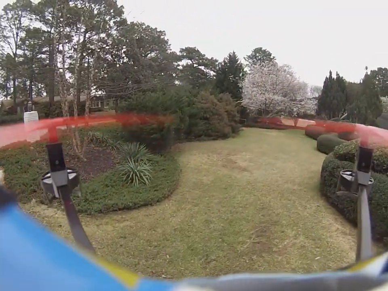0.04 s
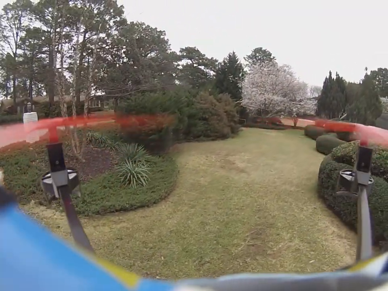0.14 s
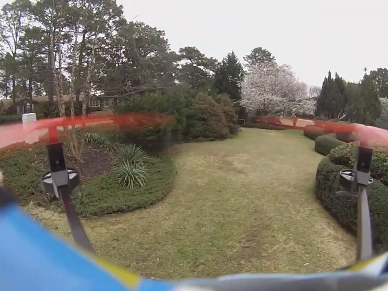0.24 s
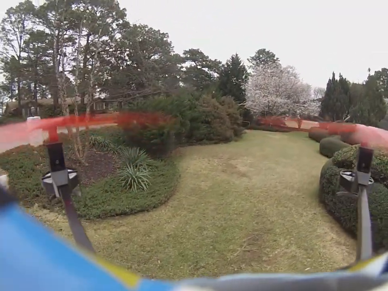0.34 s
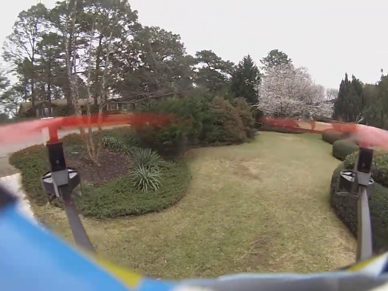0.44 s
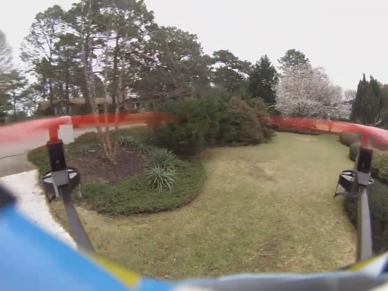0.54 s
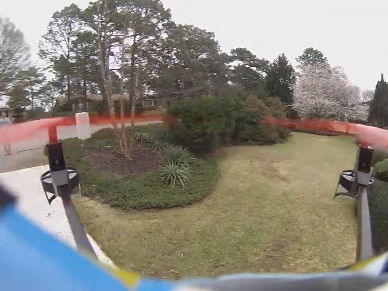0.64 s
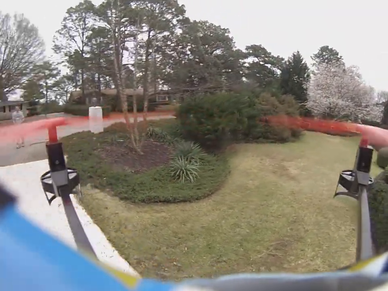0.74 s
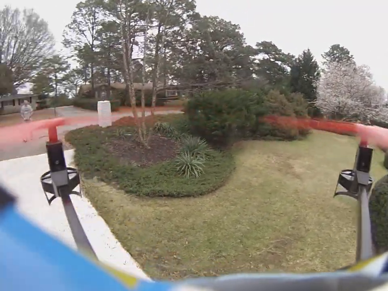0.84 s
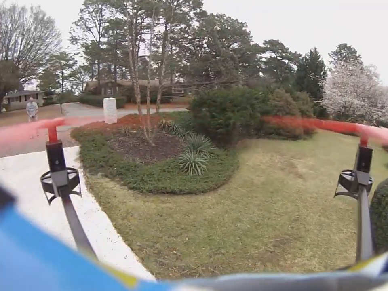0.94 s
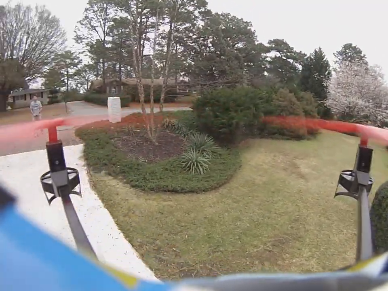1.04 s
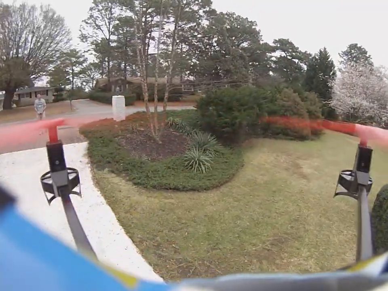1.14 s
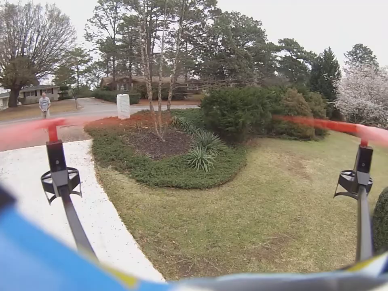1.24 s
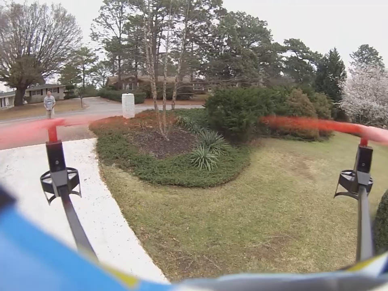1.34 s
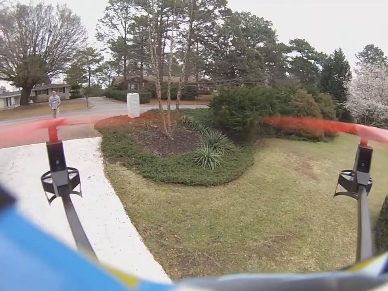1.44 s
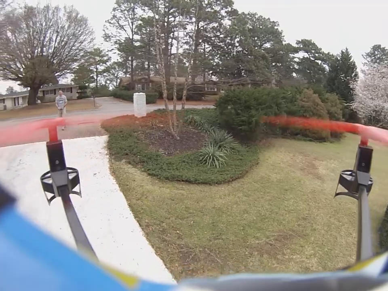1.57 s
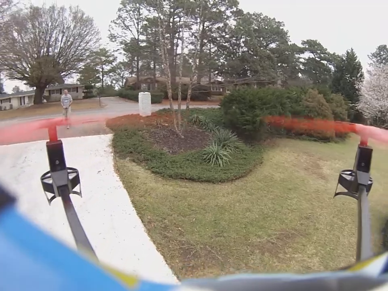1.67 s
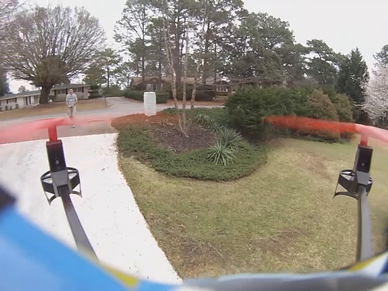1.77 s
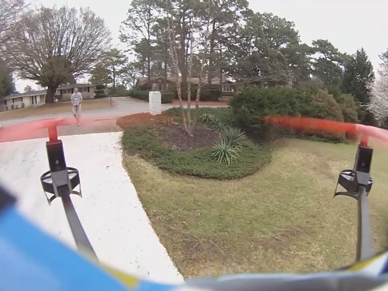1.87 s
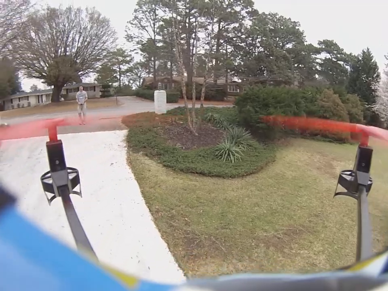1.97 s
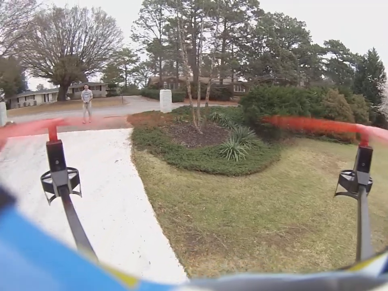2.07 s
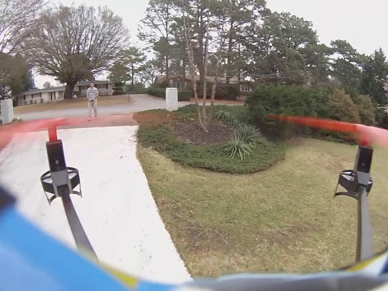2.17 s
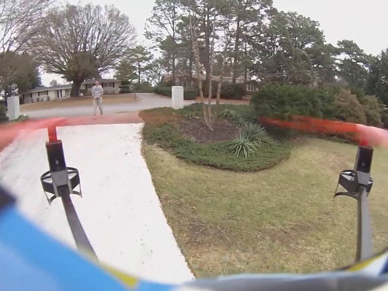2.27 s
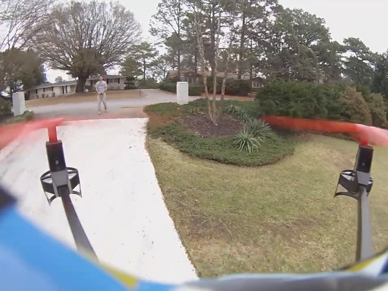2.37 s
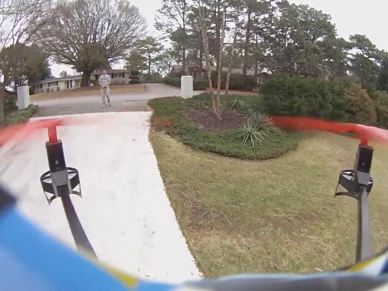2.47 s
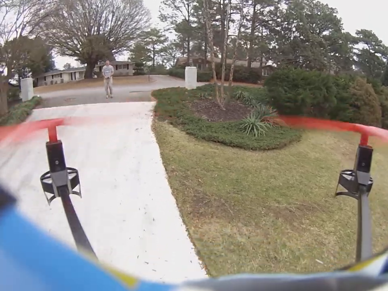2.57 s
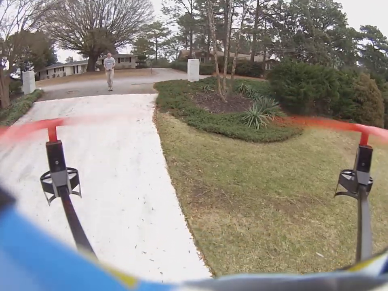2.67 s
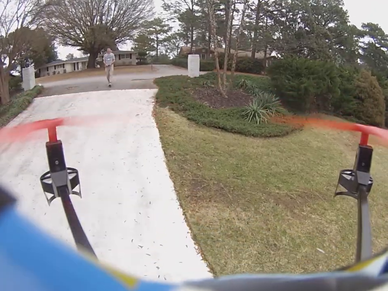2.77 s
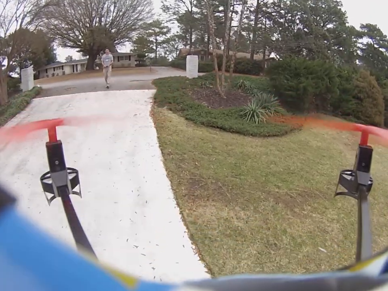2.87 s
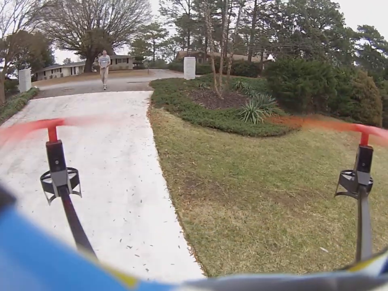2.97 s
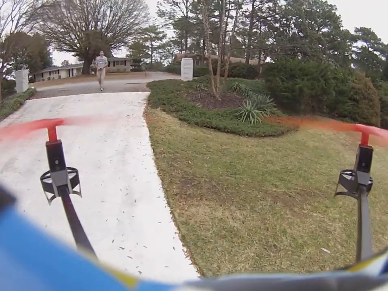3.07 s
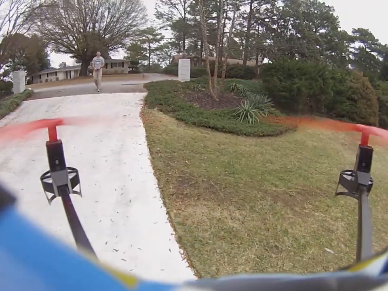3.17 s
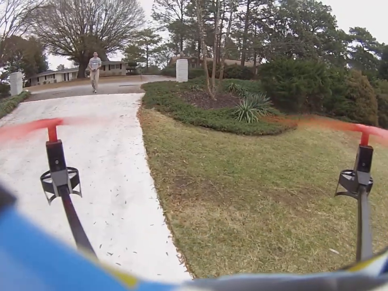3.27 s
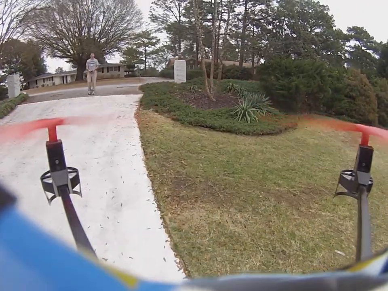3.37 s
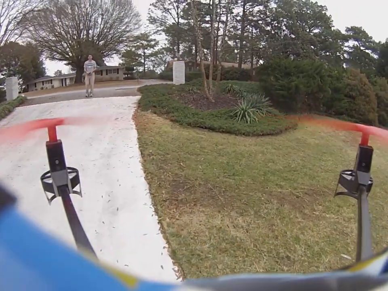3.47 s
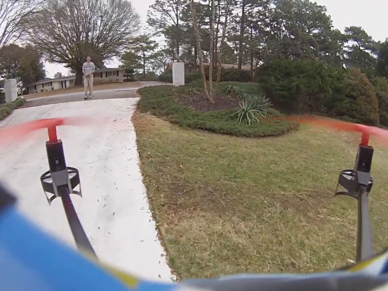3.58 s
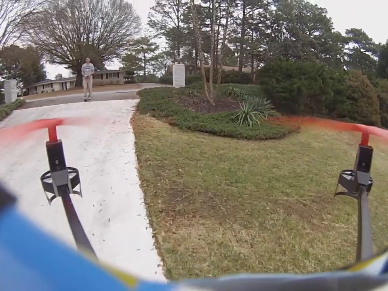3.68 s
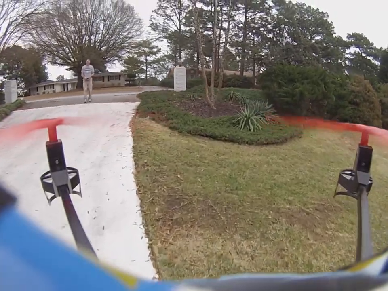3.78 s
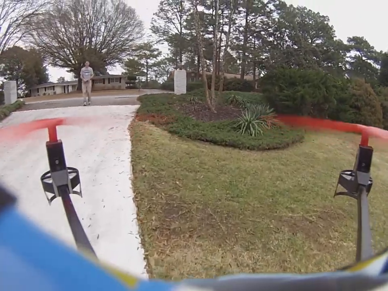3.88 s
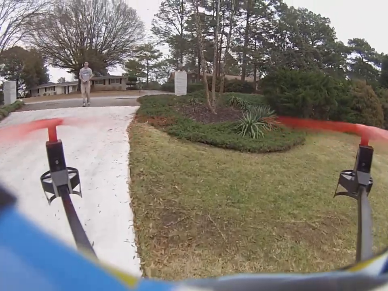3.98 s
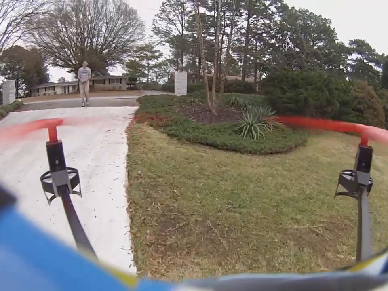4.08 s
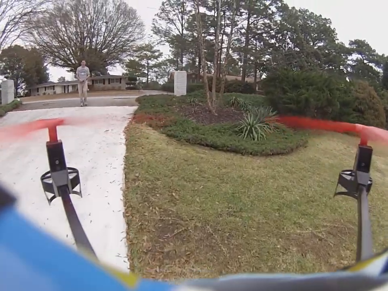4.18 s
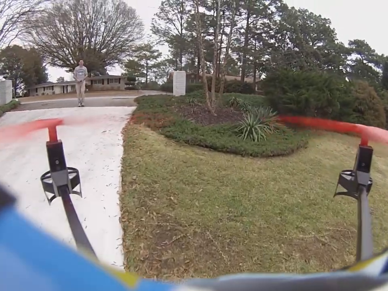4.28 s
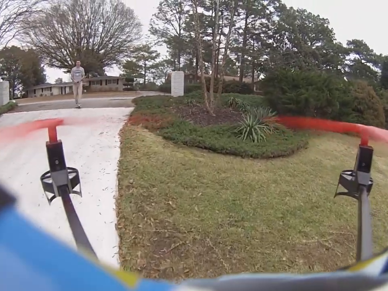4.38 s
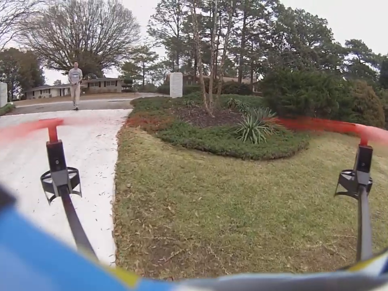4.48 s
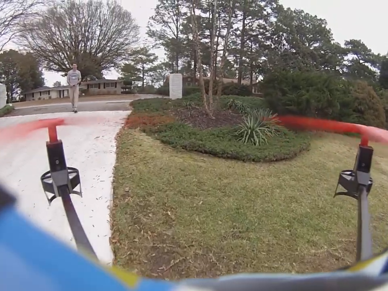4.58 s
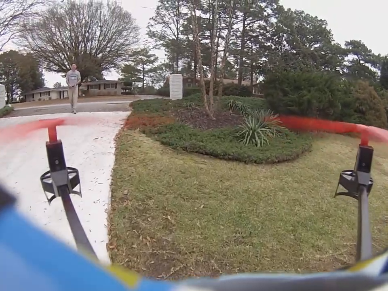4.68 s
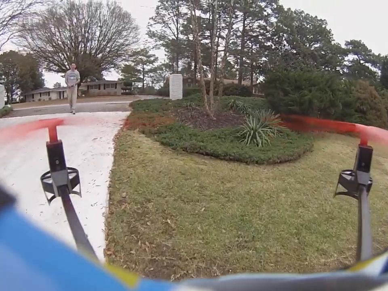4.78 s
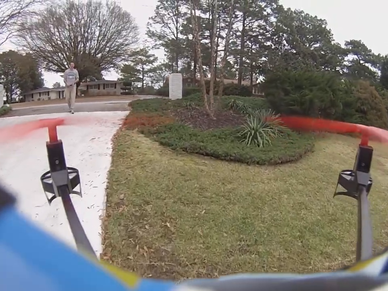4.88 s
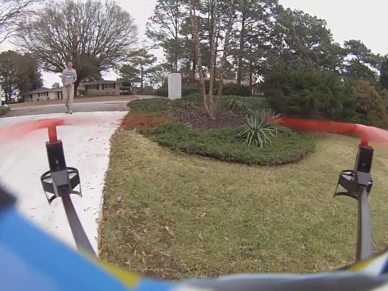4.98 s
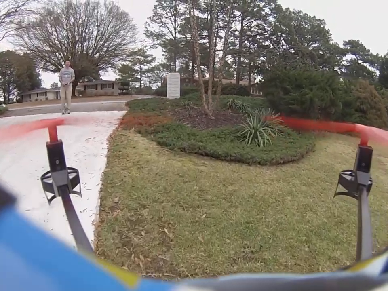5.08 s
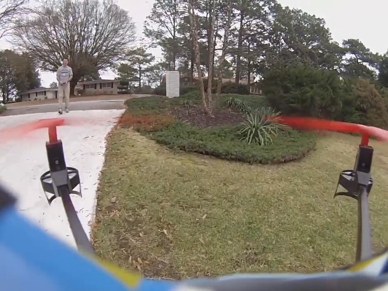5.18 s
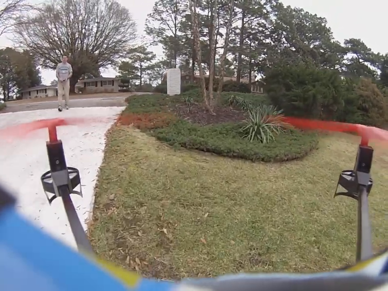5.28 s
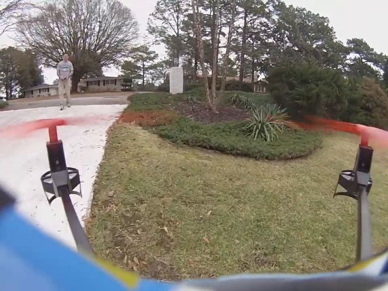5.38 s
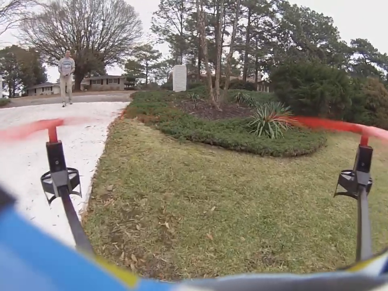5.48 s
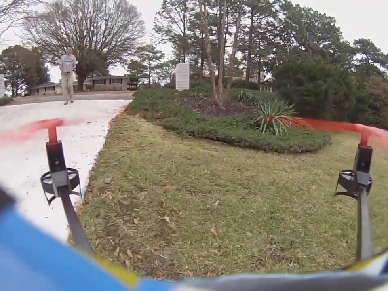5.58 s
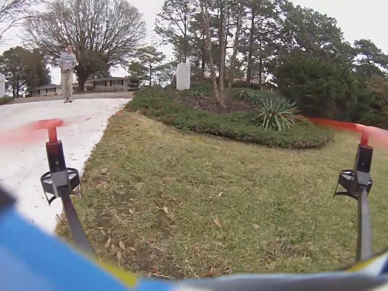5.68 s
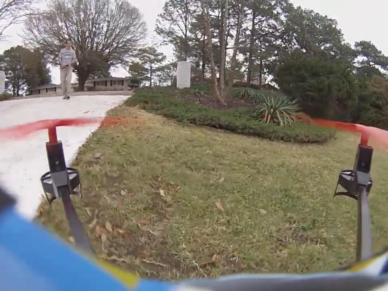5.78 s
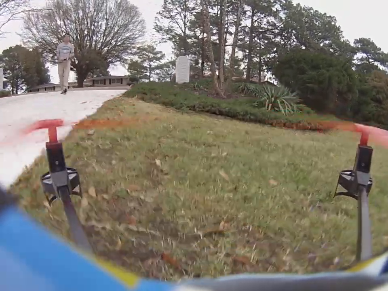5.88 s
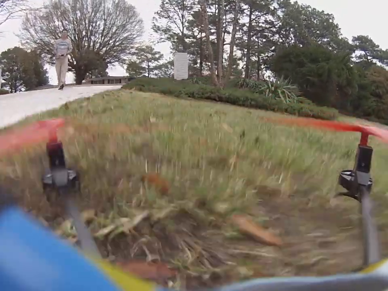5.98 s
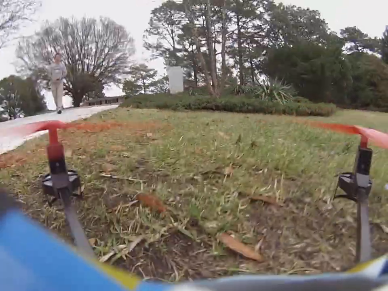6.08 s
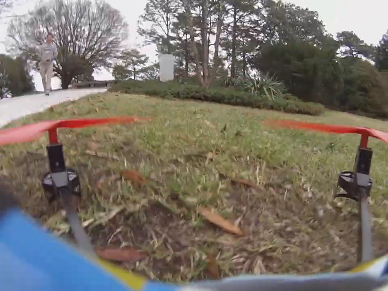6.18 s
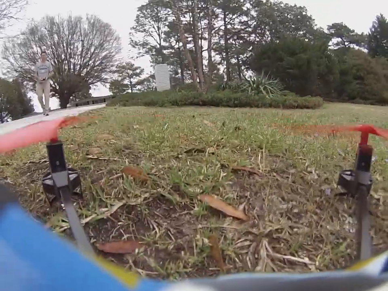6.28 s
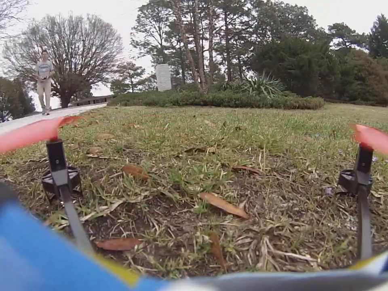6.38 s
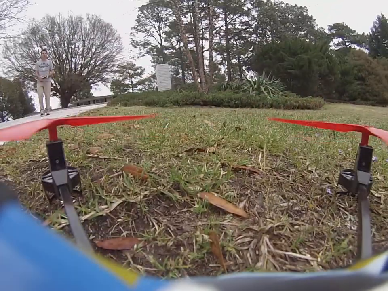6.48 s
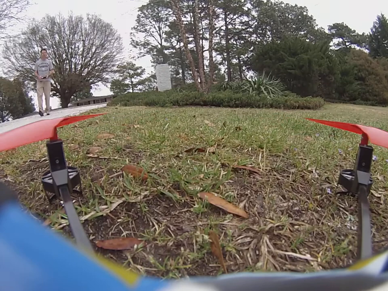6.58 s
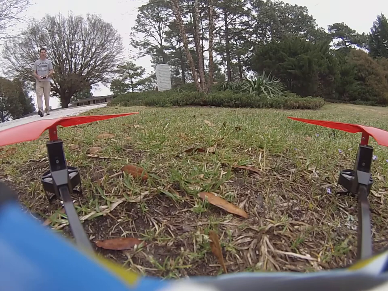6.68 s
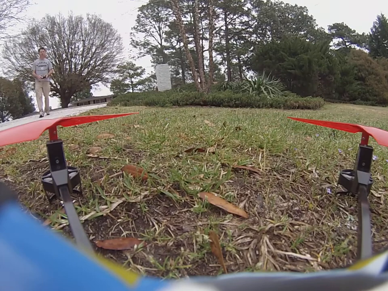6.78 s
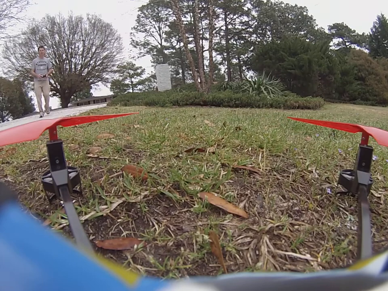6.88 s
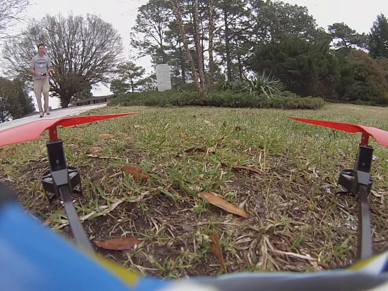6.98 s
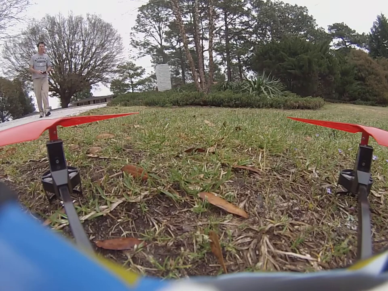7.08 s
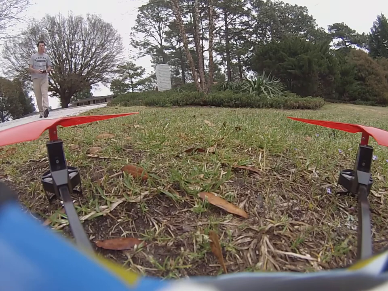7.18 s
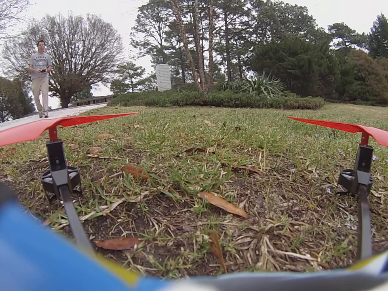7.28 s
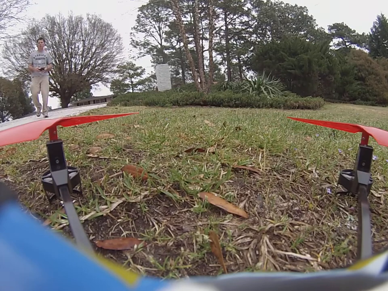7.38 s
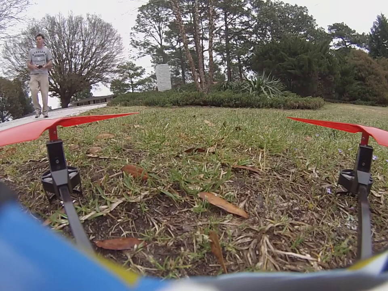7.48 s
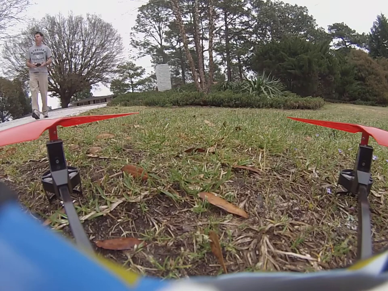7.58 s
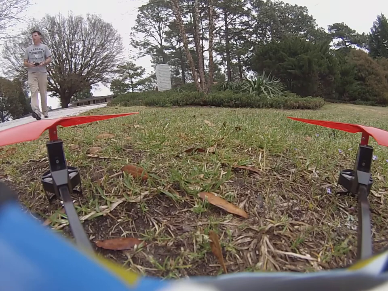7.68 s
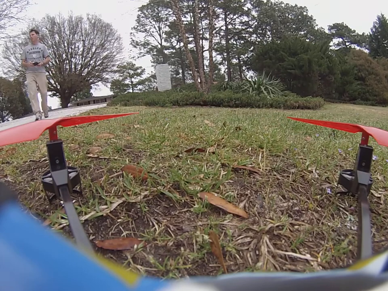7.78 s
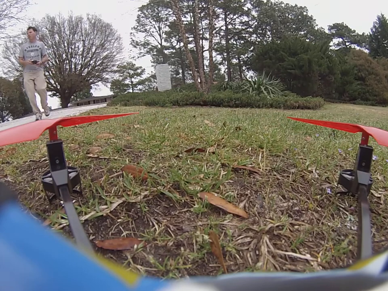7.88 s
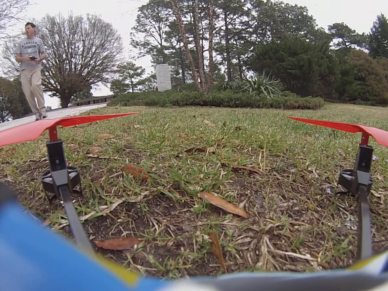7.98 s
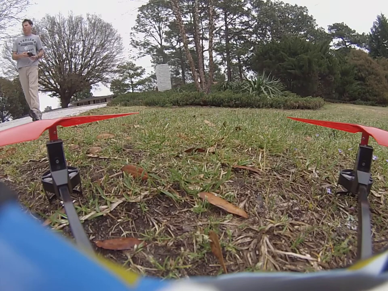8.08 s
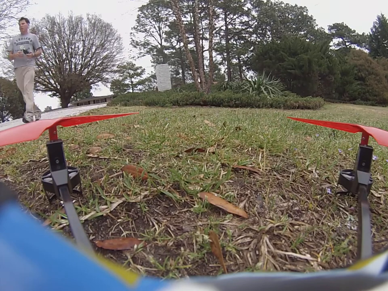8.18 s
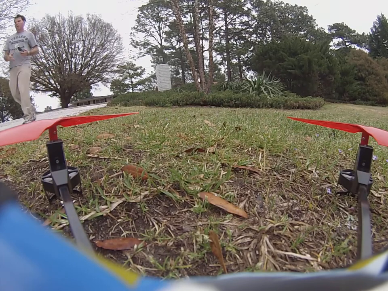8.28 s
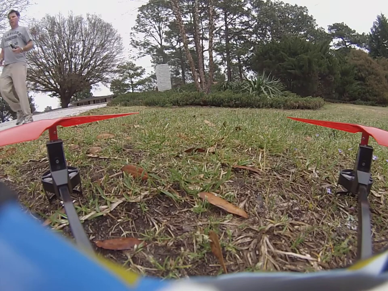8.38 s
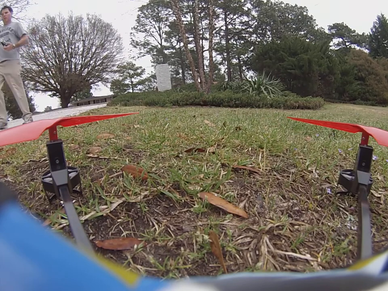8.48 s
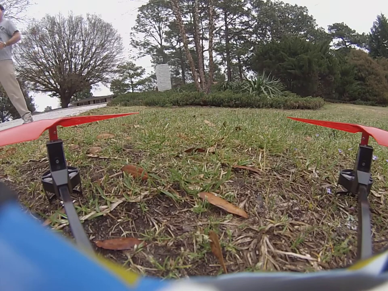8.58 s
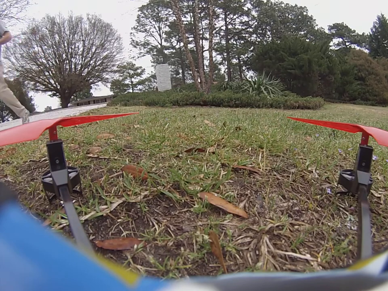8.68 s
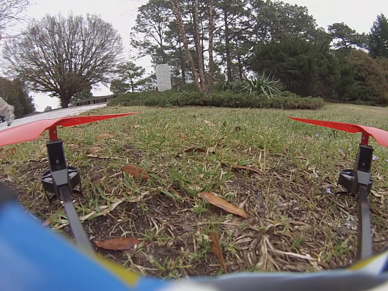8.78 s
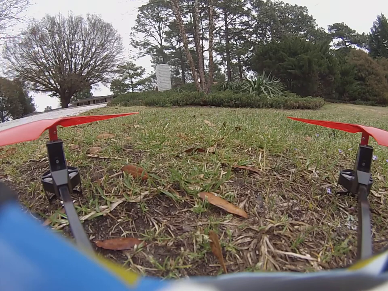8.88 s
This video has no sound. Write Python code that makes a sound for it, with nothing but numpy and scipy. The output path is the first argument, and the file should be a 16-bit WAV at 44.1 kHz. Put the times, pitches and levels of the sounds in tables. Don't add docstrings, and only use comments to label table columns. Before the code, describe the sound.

The microphone rides on a toy-like quadcopter outdoors: a loud, close, buzzing whine of several motors, drifting in pitch, with blade hiss and wind-like rumble. The pitch sags just before touchdown, sharp knocks and a small bounce follow, and power goes off abruptly. Loose gears chatter, slow and tick to rest. The remaining yard is hushed, with far traffic, soft buzzy bird trills, thin whistles and dry little ticks.

```python
import sys
import numpy as np
from scipy import signal
from scipy.fft import rfft, irfft, next_fast_len
from scipy.io import wavfile
from scipy.ndimage import uniform_filter1d

SR = 44100
rng = np.random.default_rng(int(sys.argv[2]) if len(sys.argv) > 2 else 0)


def materialize(psi):
    bounded = np.clip(np.atleast_2d(psi).T, -1, 1)
    quanta = np.round(bounded * 32767).astype(np.int16)
    wavfile.write(sys.argv[1], SR, quanta)


def elevation(decibels):
    levels = np.asarray(decibels, float)
    return 10 ** (levels / 20)


N = 394165
T = np.arange(N) / SR
GEAR = 120 / 11
CUT_S = 6.073


def columns(table):
    s, *cols = np.transpose(table)
    return [np.interp(T, s, c) for c in cols]


def ramp(start_s, db_per_s):
    return db_per_s * np.maximum(T - start_s, 0)


def unit(x):
    return x / np.sqrt(np.mean(x ** 2))


def colour(x, spectrum):
    hz, db = np.transpose(spectrum)
    size = next_fast_len(N)
    bins = np.arange(size // 2 + 1) * SR / size + 1
    gain = elevation(np.interp(np.log(bins), np.log(hz), db))
    return irfft(rfft(x, size) * gain, size)[:N]


def band(x, lo_hz, hi_hz):
    sos = signal.butter(2, [lo_hz, min(hi_hz, .45 * SR)], "band", fs=SR, output="sos")
    return signal.sosfilt(sos, x)


def walk(rate):
    k = int(SR / rate)
    held = np.repeat(rng.standard_normal(N // k + 1), k)
    return unit(uniform_filter1d(uniform_filter1d(held, k), k)[:N])


def partials(angle, orders, flicker_db):
    out = 0
    for k, db in orders:
        level = np.sqrt(2) * elevation(db + flicker_db * walk(25))
        out = out + level * np.sin(2 * np.pi * (k * angle + rng.random()))
    return out


# [f/Hz, level/dB per Hz]
YARD_TONE = [(12, -28), (20, -1), (49, 2.5), (153, 1), (254, -10.5), (456, -15), (510, -14), (554, -16),
             (1250, -23), (8090, -39), (13400, -48), (14500, -44.5), (15800, -71)]
YARD_LEVEL_DB = -48.5


def yard():
    air = unit(colour(rng.standard_normal(N), YARD_TONE))
    bass = band(air, 15, 250)
    swell = elevation(1.2 * walk(6.7))
    return elevation(YARD_LEVEL_DB) * (air + (swell - 1) * bass)


# [t/s, length/s, start f/Hz, end f/Hz, level/dB]
BUZZY_CALLS = [
    (6.84, 0.19, 6240, 8020, -59),
    (7.065, .19, 5650, 7750, -60),
    (7.29, 0.084, 5500, 6300, -57),
]
# [t/s, length/s, start f/Hz, end f/Hz, level/dB]
WHISTLED_CALLS = [
    (7.035, .02, 4250, 4200, -71),
    (7.145, .02, 4165, 4280, -76),
    (7.53, .03, 2650, 2770, -68),
    (7.59, .03, 2400, 2560, -68),
    (7.72, .2, 2350, 1840, -68),
    (8.35, 0.036, 2720, 2840, -64),
    (8.41, .04, 2150, 2480, -63),
    (8.53, .14, 2300, 2000, -63),
]
SAG = 1.3


def birds():
    out = np.zeros(N)
    uneven = 1 + .33 * walk(180)
    kinds = ((BUZZY_CALLS, 260, 1.6, .9, .3), (WHISTLED_CALLS, 30, .1, .45, .7))
    for calls, trill_hz, swing, rise, fade in kinds:
        for s, length, start_hz, end_hz, db in calls:
            t = T[:int(length * SR)]
            at = slice(int(s * SR), int(s * SR) + len(t))
            bend = SAG if end_hz < start_hz else rise
            hz = start_hz + (end_hz - start_hz) * (t / length) ** bend
            glide = np.cumsum(hz) * 2 * np.pi / SR
            trill = np.cumsum(trill_hz * uneven[at]) * 2 * np.pi / SR
            depth = swing * np.clip(t / 0.069, 0, 1)
            shape = np.sin(np.pi * t / length) ** fade
            out[at] += shape * elevation(db) * np.sqrt(2) * np.sin(glide + depth * np.sin(trill))
    echoes = ((.023, -15), (.061, -17), (.11, -19))  # (s, dB)
    return out + sum(elevation(db) * np.roll(out, int(s * SR)) for s, db in echoes)


def hits(rows, ring_s, rise_s, crack_s, grit, thud_hz):
    out, t = np.zeros(N), T[:2048]
    bright = unit(band(rng.standard_normal(N), 3800, 9500))
    rough = unit(band(rng.standard_normal(N), 500, 2100))
    for s, db, hz, crack_db, thud_db in rows:
        at = slice(int(s * SR), int(s * SR) + 2048)
        ring = np.sin(2 * np.pi * hz * t) + grit * rough[at]
        ring = ring * np.exp(-t / ring_s) * (1 - np.exp(-t / rise_s))
        crack = bright[at] * np.exp(-t / crack_s)
        thud = -np.sin(2 * np.pi * thud_hz * t) * np.exp(-t * thud_hz / 0.76)
        out[at] += elevation(db) * ring + elevation(crack_db) * crack + elevation(thud_db) * thud
    return out


# [t/s, peak level/dB, f/Hz, thud level/dB]
TICKS_IN_GRASS = [(7.226, -47, 654, -53.5), (7.292, -38, 645, -50), (7.383, -40, 1470, -52.5),
                  (7.747, -37.5, 458, -33), (8.199, -38, 440, -50), (8.259, -39, 650, -54),
                  (8.318, -34, 513, -54), (8.665, -32, 405, -48), (8.673, -46, 401, -35),
                  (8.686, -27.5, 694, -46), (8.696, -36, 910, -47), (8.723, -35.5, 1570, -39),
                  (8.751, -38, 448, -52)]


def grass_ticks():
    rows = [(s, db, hz, -90, thud_db) for s, db, hz, thud_db in TICKS_IN_GRASS]
    return hits(rows, ring_s=0.0016, rise_s=0.00028, crack_s=.001, grit=0.31, thud_hz=220)


# [t/s, peak level/dB, thud level/dB, crack level/dB]
FRAME_KNOCKS = [(6.043, -2, -15, -23.5), (6.05, -15.5, -4, -14.5), (6.063, -1, -14, -18.5),
                (6.064, -6.5, -6.5, -20.5), (6.066, -19.5, -17.5, -2.5), (6.071, -16.5, -23.5, -22.5),
                (6.119, -17, -22, -20), (6.255, -8, -16, -11), (6.283, -21.5, -16.5, -27),
                (6.296, 1, -23.5, -6.5), (6.305, -0.5, -12.5, -28.5), (6.468, -7.5, -32, -8.5)]


def landing_knocks():
    rows = [(s, db, 1100, crack_db, thud_db) for s, db, thud_db, crack_db in FRAME_KNOCKS]
    return hits(rows, ring_s=0.0011, rise_s=0.0006, crack_s=0.00089, grit=1.0, thud_hz=111)


# [t/s, peak level/dB, f/Hz, crack level/dB]
LAST_TEETH = [(6.655, -13.5, 1090, -25.5), (6.718, -17.5, 1440, -34.5), (6.745, -17, 1110, -48),
              (6.771, -18, 1150, -45), (6.82, -20, 1340, -49), (6.846, -21.5, 1440, -46),
              (6.884, -23, 1260, -39), (6.908, -24.5, 1420, -42.5), (6.934, -25, 1250, -63),
              (6.946, -41, 1070, -52), (6.972, -29, 2290, -54), (6.994, -41, 1370, -48),
              (7.018, -24, 1040, -40), (7.042, -27, 1340, -52)]


def gear_teeth():
    rows = [(s, db, hz, crack_db, -80) for s, db, hz, crack_db in LAST_TEETH]
    return elevation(-2) * hits(rows, ring_s=0.002, rise_s=0.0019, crack_s=0.001, grit=1.44, thud_hz=110)


# [f/Hz, level/dB per Hz]
CHATTER_TONE = [(150, -53), (250, -20.5), (518, -12), (872, -9.5), (1000, -3.5), (1390, 1.5), (1690, -2),
                (2040, 5), (3090, -1), (3490, -4), (8170, -10), (9890, -24), (15800, -36)]
# [multiple of the motor turn, level/dB against the rattle]
COAST_SONG = [(1, -12), (2, -16), (3, -7), (4, -14), (9, -10)]
# [f/Hz, width/Hz, level/dB]
FRAME_MODES = [
    (570, 190, 1.5),
    (1250, 530, 8),
    (2360, 300, -10.5),
]
# [t/s, depth/dB]
GAIN_DUCKS = [
    (6.073, 17.9),
    (6.3, 5),
]
# [t/s, level/dB]
BODY_SHAKES = [
    (6.073, -26.5),
    (6.285, -28.5),
]
HOLD_S, SEIZE_S, STOP_S = 6.503, 6.86, 7.052


def rattle(angles):
    duck_db = sum((T > s) * np.maximum(db - ramp(s, 95), 0) for s, db in GAIN_DUCKS)
    rattle_db = -22.5 - ramp(HOLD_S, 47) - ramp(SEIZE_S, 45) - duck_db
    bright_db = -5 - ramp(HOLD_S, 28)
    clatter = unit(sum(np.exp(-(a % 1) / 0.62) * rng.standard_normal(N) for a in angles[:2]))
    song = band(sum(partials(a, COAST_SONG, 2.5) for a in angles), 480, 1400)
    chatter = colour(clatter + elevation(-10) * song, CHATTER_TONE) * (T > CUT_S)
    frame = 0
    for hz, width, db in FRAME_MODES:
        frame = frame + elevation(db) * unit(band(clatter, hz - width / 2, hz + width / 2))
    slow = np.clip((T - 6.45) / 0.53, 0, .8)
    low = np.sqrt(1 - slow) * unit(band(chatter, 270, 2800)) + np.sqrt(slow) * unit(frame)
    apart = np.clip((T - 6.47) / .12, 0, .7)
    tooth = np.exp(-(angles[2] % 1) / 0.28)
    high = unit(band(chatter, 2100, 16000) * (1 - apart + 3 * apart * tooth))
    shaken = elevation(-49.5) + sum((T > s) * elevation(db - ramp(s, 90)) for s, db in BODY_SHAKES)
    shake = rng.standard_normal(N)
    body = unit(band(shake, 60, 169)) + unit(band(shake, 13, 50))
    out = elevation(rattle_db + 0.5) * (low + elevation(bright_db) * high) + shaken * body
    return out * (T > CUT_S) * (T < STOP_S)


# [f/Hz, level/dB per Hz]
BLADE_TONE = [(200, -32.5), (300, -24), (400, -10.5), (585, -7.5), (800, -15), (1100, -6), (1600, -3.5),
              (2220, -4), (3200, -14.5), (5500, -10.5), (6520, -14), (7620, -10.5), (11000, -24.5),
              (15000, -30)]
# [t/s, buffeting level/dB]
WASH_BUFFETING = [(0, -45.5), (2.97, -46), (3.09, -33.5), (3.6, -27.5), (3.82, -38), (4.04, -33.5),
                  (4.14, -26.5), (5.4, -25.5), (6.07, -29.5)]
HISS_LEVEL_DB, NEAR_GROUND_DB = -18, 1.5
GROUND_S, GROUND_RISE_S = 5.3, .5


def airflow(angles):
    near = np.clip((T - GROUND_S) / GROUND_RISE_S, 0, 1)
    hiss_db = HISS_LEVEL_DB + NEAR_GROUND_DB * near
    rumble_db = columns(WASH_BUFFETING)[0]
    swell = 0
    for a in angles:
        turn = 2 * np.pi * a / GEAR
        beat = np.exp(0.13 * np.cos(2 * turn) + 0.085 * np.cos(turn))
        swell = swell + beat * rng.standard_normal(N)
    hiss = unit(colour(swell, BLADE_TONE)) * elevation(hiss_db + 0.55 * walk(30))
    hiss = hiss - near * .3 * band(hiss, 2000, 16000)
    gusts = rng.standard_normal(N)
    rumble = unit(band(gusts, 30, 66)) + elevation(-2.5) * unit(band(band(gusts, 120, 250), 120, 250))
    rumble = rumble * elevation(rumble_db - 2.5 + 3.1 * walk(10))
    wash = elevation(hiss_db - 28.0) * unit(band(gusts, 150, 230))
    return (hiss + wash + rumble) * (T < CUT_S)


INERTIA_S = .07
COAST_S, FRICTION = .5, .157


def turns(hz, wobble):
    drag = np.exp(-np.maximum(T - CUT_S, 0) / COAST_S)
    coast = np.maximum((1 + FRICTION) * drag - FRICTION, 0)
    return np.cumsum(hz * coast * (1 + wobble * walk(60))) / SR + rng.random()


# [t/s, f/Hz]
SPEED_A = [(0, 595), (.2, 585), (.5, 653), (.66, 643), (.93, 559), (1.38, 554), (1.72, 591), (2.12, 600),
           (2.72, 553), (2.88, 564), (3.15, 626), (3.36, 652), (3.77, 651), (4.02, 608), (4.55, 628),
           (5.24, 615), (5.6, 553), (6.07, 497)]
SPEED_B = [(0, 523), (.27, 520), (.48, 432), (.81, 574), (1.33, 484), (1.7, 522), (2.4, 536), (3.05, 592),
           (3.6, 606), (3.78, 624), (4.05, 568), (4.47, 545), (4.97, 554), (5.31, 449), (5.6, 461),
           (5.87, 418), (5.95, 452), (6.07, 352)]
SPEED_C = [(0, 600), (.18, 583), (.5, 640), (.66, 634), (1.0, 576), (1.35, 570), (1.65, 587), (2.22, 590),
           (2.45, 556), (2.75, 539), (3.22, 616), (3.6, 607), (3.77, 619), (4.02, 576), (4.5, 592),
           (5.3, 575), (5.62, 474), (6.07, 406)]
SPEED_D = [(0, 518), (.27, 517), (.5, 454), (.85, 566), (1.2, 516), (1.36, 503), (1.95, 539), (3.77, 555),
           (4.03, 516), (4.65, 507), (4.96, 513), (5.25, 457), (5.55, 445), (6.07, 399)]
# [motor, [multiple of its turn, level/dB against the leading line]]
WHINE_VOICES = [
    (0, [(1, 0)]),
    (0, [(3, 0)]),
    (0, [(7, -12), (8, -9), (9, 0)]),
    (1, [(1, -12), (3, 0)]),
    (1, [(4, 1), (5, 0), (7, -4), (9, -3)]),
    (2, [(6, -9), (7, -3), (8, 0)]),
    (2, [(9, 0)]),
    (2, [(1, 0)]),
]
# [level off resonance/dB, [motor f/Hz, half width/Hz, lift/dB]]
ARM_RESONANCES = [(-35, [(600, 90, 5.5)]), (-36, [(640, 45, 9.5), (530, 10, 8)]), (-45, [(642, 50, 17)]),
                  (-35, [(603, 35, 10), (410, 60, 10)]), (-41.5, [(520, 30, 9)]), (-43, [(590, 20, 10.5)]),
                  (-45, [(605, 45, 11.5)]), (-37, [(520, 60, 3)])]
# [multiple of its turn, level/dB]
D_WHINE = [
    (1, -5),
    (3, -1),
    (4, -4),
]
# [multiple of the propeller turn, level/dB]
PROPELLER_THRUM = [
    (1, -22),
    (2, 0),
    (3, -22),
    (4, -10),
    (6, -16),
    (8, -24),
]
PROPELLER_SHARES = [-2, -11, -5, -4.5]
D_LEVEL_DB, THRUM_LEVEL_DB = -35, -20
WASH_DAMPS_THRUM = 0.067
STRAIN_DB, STRAIN_HZ_PER_S = 2.5, 300


def motors():
    commands = (SPEED_A, SPEED_B, SPEED_C, SPEED_D)
    inertia = int(INERTIA_S * SR)
    speeds = [uniform_filter1d(columns(c)[0], inertia, mode="nearest") for c in commands]
    angles = [turns(hz, wobble=.0021) for hz in speeds]
    tone = elevation(D_LEVEL_DB) * partials(angles[3], D_WHINE, 1.4)
    for (m, whine), (db, peaks) in zip(WHINE_VOICES, ARM_RESONANCES):
        for hz, width, lift_db in peaks:
            db = db + lift_db / (1 + ((speeds[m] - hz) / width) ** 2)
        change = uniform_filter1d(np.abs(np.gradient(speeds[m])) * SR, inertia)
        db = db + STRAIN_DB * np.tanh(change / STRAIN_HZ_PER_S)
        turn = 2 * np.pi * angles[m] / GEAR
        load = 1 + .35 * np.cos(turn) + .25 * np.cos(2 * turn)
        tone = tone + elevation(db + .7) * load * partials(angles[m], whine, 1.8)
    thrum = 0
    for a, db in zip(angles, PROPELLER_SHARES):
        thrum = thrum + elevation(db) * partials(a / GEAR, PROPELLER_THRUM, 0.87)
    wash_db = columns(WASH_BUFFETING)[0]
    thrum_db = THRUM_LEVEL_DB - WASH_DAMPS_THRUM * (wash_db - wash_db[0])
    return (tone + elevation(thrum_db) * thrum) * (T < CUT_S), angles


# [f/Hz, level/dB]
TREBLE_LIMIT = [(15200, 0), (15600, -45)]


def scene():
    tone, angles = motors()
    noises = airflow(angles) + rattle(angles) + landing_knocks() + gear_teeth()
    mono = tone + colour(noises, TREBLE_LIMIT) + grass_ticks() + birds() + yard()
    return np.array([mono, mono])


def top_cut(x):
    return signal.sosfilt(signal.butter(12, 16520, fs=SR, output="sos"), x)


# [f/Hz, level/dB per Hz]
AMPLIFIER_TONE = [(120, -46), (200, -16), (353, -2), (522, -12), (624, -1), (3260, 0), (9140, -7),
                  (14000, -27.5)]
AMPLIFIER_DB, GAIN_OPEN_S = -78.5, 6.98


def record(dry):
    hiss = unit(colour(rng.standard_normal(N), AMPLIFIER_TONE))
    hiss = hiss * elevation(AMPLIFIER_DB) * (T > GAIN_OPEN_S)
    mix = np.clip(dry + np.array([hiss, -hiss]), -1, 1)
    return top_cut(mix)


dry = scene()
out = record(dry)
materialize(out)
```